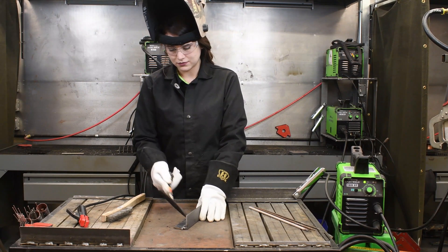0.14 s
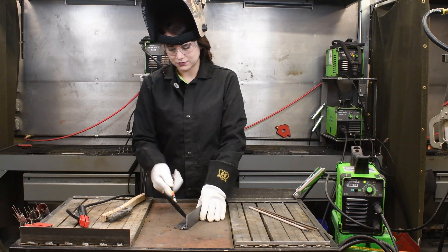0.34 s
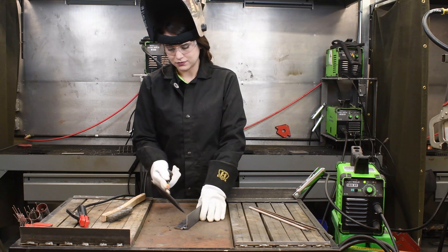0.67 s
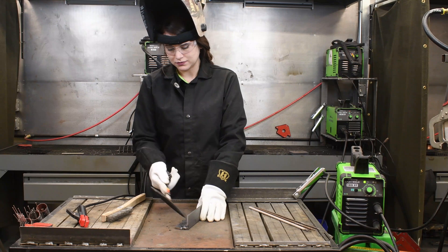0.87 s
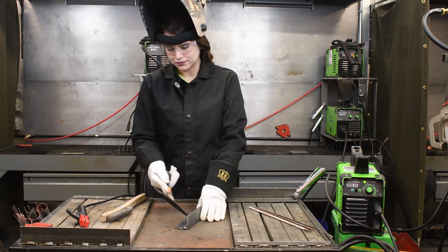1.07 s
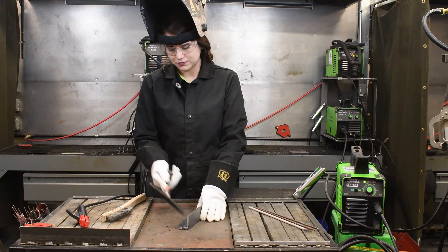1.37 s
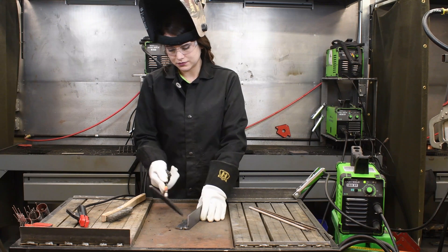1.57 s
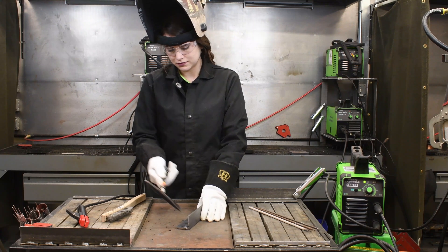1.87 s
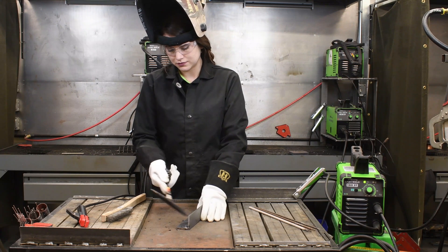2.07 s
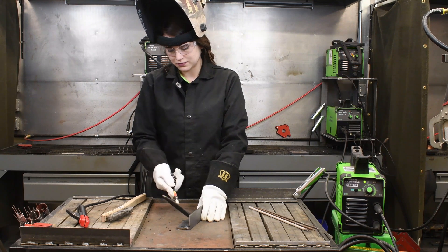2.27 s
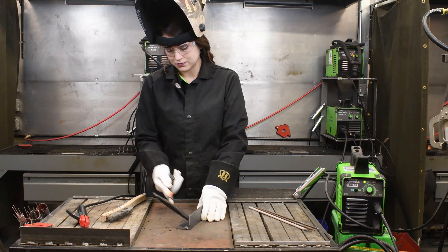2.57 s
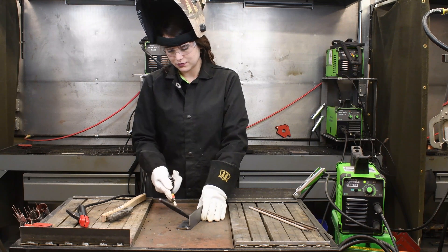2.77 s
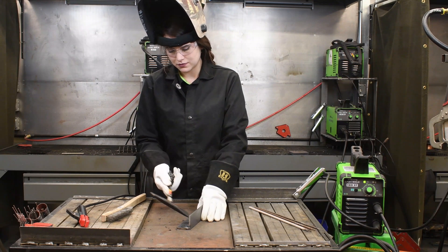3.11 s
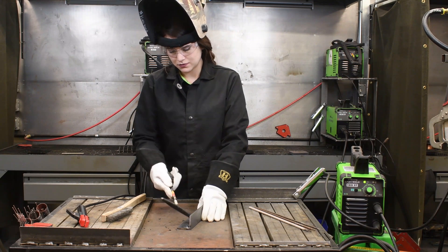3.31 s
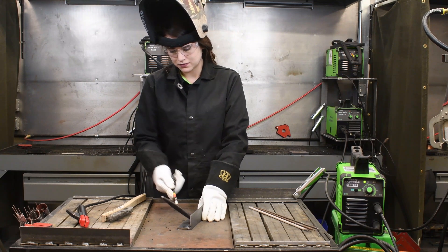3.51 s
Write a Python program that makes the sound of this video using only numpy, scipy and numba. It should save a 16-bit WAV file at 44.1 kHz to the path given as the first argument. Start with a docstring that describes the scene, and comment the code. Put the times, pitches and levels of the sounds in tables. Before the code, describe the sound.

A chipping hammer hits a steel plate on a metal bench about four times a second, bright clangs overlapping with crackling slag; then a short groan, a scrape and weaker blows over faint workshop air, close stereo.

```python
"""Welding booth, stereo pair: at the start a blow on a steel plate is already ringing over workshop air.
A chipping hammer goes on about four times a second, slower later; each blow sums a noise clang, decaying
modes of bench and steel, slag clicks, a dull thump and a sway of the bench frame.
At 2.5 s the plate groans (sine), from 2.74 s the tip drags over the bead (knocks through the bench response),
at 3.07 s a flake lands (noise tick). The recorder's limiter squeezes the peaks and its filter cuts the top."""
import sys
import numpy as np
from scipy import signal
from scipy.fft import rfft, irfft, next_fast_len
from scipy.io import wavfile
from scipy.ndimage import uniform_filter1d, minimum_filter1d
from numba import njit

SR = 44100
rng = np.random.default_rng(int(sys.argv[2]) if len(sys.argv) > 2 else 0)


def persist_wave(psi):
    """Save psi, clipped to +-1, as 16-bit WAV."""
    counts = np.round(np.clip(psi, -1, 1) * 32767).astype(np.int16)
    wavfile.write(sys.argv[1], SR, np.atleast_2d(counts).T)


N = 160965  # length in samples

# Hammer blows [t/s, strength level/dB, boom level/dB, middle against outer registers level/dB (half each way),
# steel ring level/dB, treble level/dB, accent f/Hz, accent level/dB, singing mode f/Hz, its level/dB]
BLOWS = [ (-.085, -1, -1.5, -1.5, 4, 0, 1740, 3.5, 1297, 14),
         (0.1544, 1.5, -2, 0.5, 5.5, 3, 2830, 5.5, 3100, -5),
         (0.4074, -0.5, 1.5, 1, -10, 3.5, 340, -0.5, 5700, 6),
         (0.6452, -4, 3, -0.5, -14, 0, 358, 2, 6370, 13), (0.8645, 0.5, -1, 0.5, 1, 0, 1400, 1, 3140, 6),
         (1.0874, -4, -4.5, -1.5, -1, -2, 855, 5, 2958, 7.5),
         (1.3084, -4.5, 6, 4.5, 2.5, 1.5, 696, 0, 1297, 2),
         (1.5328, 0, 4, 2.5, -4, -0.5, 5470, 0.5, 1379, -2), (1.7523, 2.5, -1, 5, 4.5, 3, 2660, 3, 3200, 8),
         (2.0510, 6.5, -6, 0, -7, -2, 5900, 3.5, 6115, 2), (2.3035, 6, -5, 0, 2, 1, 1430, 0.5, 2345, 2),
         (2.7093, -6, -8, 2.5, 1, -0.5, 1400, 3, 9470, 11.5),
         (3.3481, -2, 0, 0.5, -8, -4, 170, 0.5, 2310, 9), (3.5858, -8, 3, 2.5, -9, -6, 170, 3, 3150, 3)]
# Dense ringing of bench and booth [f/Hz, relative level/dB, t60/s, left-right correlation/0-1,
# left minus right level/dB]
CLANG_BANDS = [(116, -45, 0.99, 1, 2), (170, -26.5, 1, 0.99, -0.5), (295, -24.5, 0.92, 0.92, 0.5),
               (480, -24.5, 0.8, 0.94, 0), (840, -23.5, 0.74, 0.67, 0), (1400, -21.5, 0.75, 0.51, 0),
               (2020, -22, 0.64, 0.18, -1.8), (3200, -21.5, 0.64, 0.02, -0.2),
               (4400, -21.5, 0.52, 0.35, -0.5), (5920, -20.5, 0.4, 0.25, 0), (7350, -25.5, 0.45, 0.16, 1.5),
               (9400, -27.5, 0.41, 0.2, -5.5), (10340, -37, 0.33, 0.16, -6), (14700, -50, 0.37, 0, 3)]
# Modes of the bench top [f/Hz, relative level/dB]
BENCH_MODES = [(133, -26), (168, -24), (189, -28.5), (228, -26.5), (258, -22.5), (302, -17.5), (349, -14),
               (377, -27)]
# Modes of hammer and plate [f/Hz]
STEEL_HZ = [832, 1297, 1379, 2305, 2345, 2385, 2578, 2958, 3120, 3176, 3748, 5406, 5556, 6115, 6210, 6836,
            8250, 9215, 9470]
# Their strengths, in the same order [relative level/dB]
STEEL_LEVELS = [-28.5, -38, -27, -20, -16, -24.5, -25.5, -21.5, -44, -31, -30, -26.5, -26, -26.5, -29.5,
                -30, -25, -30, -32]
# Sway of the bench frame [f/Hz, relative level/dB, t60/s]
FRAME = (67.2, -39, 1.75)
# Dull push of each blow through the floor [f/Hz, relative level/dB, decay time constant/s]
THUMP = (44, -42, 0.057)
# Spectrum of the workshop air [f/Hz, relative level/dB per Hz]
AIR_SPECTRUM = [(25, -11), (60, -31), (110, 0), (200, -17), (400, 7.5), (1000, 2), (2000, -1.5),
                (4000, -9.5), (8000, -19.5), (11000, -31), (16000, -58)]
# The plate shifts on the bench with a short groan [t/s, f/Hz, level/dB]
SHIFT = (2.5, 180, -19)
# Pressure on the tip as it drags [t/s, relative level/dB]
DRAG_PRESSURE = [(2.741, -11.5), (2.785, -5), (2.804, 1), (2.85, -4), (2.89, -15.5), (2.95, -22)]
# The plate judders under the dragging tip [f/Hz, relative level/dB]
JUDDER_MODES = [(190, -23), (258, -12), (312, -13.5)]
# A flake of slag lands [t/s, f/Hz, level/dB at the onset]
FLAKE = (3.066, 8600, -49)

# the blow: register edges, widths of its colourings, onset
BOOM_HZ, TREBLE_HZ = 464, 3530
ACCENT_OCTAVES, SING_OCTAVES = 0.45, 0.035
SAME_SPOT = 0.24  # share of the clang's power that every blow has in common
SPOT_RIPPLE_DB = 2.2  # random unevenness of the clang above the boom
ATTACK_S, BOOM_RISE_S = 0.0036, 0.0023
CRACK_DB, CRACK_S = 12.5, 0.0087  # bright crack of the contact, over the clang; weaker low down
RING_N = SR  # samples in one response

# modes
GRIP_DETUNE, MODE_SCATTER_DB = 0.002, 1.8  # spread of frequency (ratio) and level
MODE_DAMP_HZ = 9000  # here a mode dies twice as fast
BENCH_DB, BENCH_T60_S, BENCH_BLUR, BENCH_BLUR_HZ = 2.5, 0.52, 1, 24
BENCH_LOW_HZ = 117  # the bench top radiates little below this
STEEL_DB, STEEL_T60_S, STEEL_BLUR, STEEL_BLUR_HZ = 1.5, 0.52, 1.6, 45

# slag, air, groan, drag, flake
SLAG_DB, SLAG_PER_S, SLAG_FALL_S, SLAG_HZ = -32.5, 1000, 0.06, 6650
AIR_DB, AIR_LIKENESS = -38, 0.46
SHIFT_S = 0.035
DRAG_DB, DRAG_LOW_HZ, DRAG_TOP_HZ = -13, 147, 11100
SLIPS_PER_S, SLIP_SCATTER_DB = 170, 4  # inverse of the median gap; spread of knock level
FLAKE_DECAY_S = 0.022

# recorder
DRIVE_DB, LIMIT_DB, LIMIT_RATIO, RELEASE_S, MAKEUP_DB = 0.5, -0.5, 2.73, 0.036, 0.5
TOP_HZ = 15650


def undb(db):
    """Decibels to gain."""
    return 10 ** (np.asarray(db) / 20)


def unit(x):
    """Scale to rms 1."""
    return x / np.sqrt(np.mean(x ** 2))


def on_log(hz, points, values):
    """Read a curve on a log-frequency axis."""
    return np.interp(np.log(np.maximum(hz, 1)), np.log(points), values)


def bell(hz, centre, octaves):
    """Bell curve on a log-frequency axis, 1 at its centre."""
    return np.exp(-(np.log2(hz / centre) / octaves) ** 2)


def band(x, hz, octaves):
    """Smooth band-pass around hz."""
    f = np.maximum(np.fft.rfftfreq(x.shape[-1], 1 / SR), 1)
    return irfft(rfft(x) * bell(f, hz, octaves), x.shape[-1])


def high_pass(x, hz):
    """Remove what lies below hz."""
    return signal.sosfilt(signal.butter(4, hz, "high", fs=SR, output="sos"), x)


def decay(t, t60):
    """Exponential fall by 60 dB in t60 seconds."""
    return np.exp(-np.log(1000) * t / t60)


def stereo(pair, likeness):
    """Two unrelated signals to the left and right microphone with the given correlation."""
    c = np.clip(likeness, 0, 1)
    middle = np.sqrt((1 + c) / 2) * pair[0]
    side = np.sqrt((1 - c) / 2) * pair[1]
    return middle + side * np.array([[1], [-1]])


def add(out, x, start):
    """Mix x in at a time in s, cut to the length of the scene."""
    i = int(round(start * SR))
    a, b = max(i, 0), min(i + x.shape[-1], N)
    out[:, a:b] += x[:, a - i:b - i]


def noise_bands(centres, size):
    """Pairs of noises of rms 1 in adjoining bands."""
    f = np.fft.rfftfreq(size, 1 / SR)
    which = np.searchsorted(np.sqrt(centres[1:] * centres[:-1]), f)
    spectrum = rfft(rng.standard_normal((2, size))) * (f > centres[0] ** 2 / centres[1])
    return np.array([unit(irfft(spectrum * (which == k), size)) for k in range(len(centres))],
                    dtype=np.float32)


def ring(modes, t60, blur, blur_hz, likeness):
    """Decaying modes, a little different with every grip and blurred by the booth's reflections."""
    t = np.arange(0, RING_N, dtype=np.float32) / SR
    knots = np.arange(0, 200) / blur_hz
    out = np.zeros((2, RING_N))
    for hz, db in modes:
        detune, size = rng.standard_normal(2)
        turn = np.float32(2 * np.pi * hz * (1 + GRIP_DETUNE * detune)) * t
        fade = decay(t, t60 / (1 + (hz / MODE_DAMP_HZ) ** 2))  # high modes die sooner
        for ch in range(2):
            # steady phasor plus a wandering one
            scatter = rng.standard_normal(len(knots)) + 1j * rng.standard_normal(len(knots))
            phasor = np.exp(2j * np.pi * rng.random()) + blur * scatter / np.sqrt(2)
            phasor = undb(db + MODE_SCATTER_DB * size) * phasor
            in_phase = np.interp(t, knots, phasor.real) * np.cos(turn)
            quadrature = np.interp(t, knots, phasor.imag) * np.sin(turn)
            out[ch] += fade * (in_phase + quadrature)
    return stereo(out, likeness) / np.hypot(1, blur)


def workbench():
    """Return the response of plate, bench and booth to one contact: noise bands plus decaying modes."""
    t = np.arange(RING_N) / SR
    hz = np.geomspace(100, 15000, 50)
    table = np.array(CLANG_BANDS)
    db, t60, likeness, pan_db = (on_log(hz, table[:, 0], col) for col in table.T[1:])
    low = 1 / (1 + (hz / BOOM_HZ) ** 4)
    high = 1 / (1 + (TREBLE_HZ / hz) ** 4)
    rise = 1 - np.exp(-t / (ATTACK_S + BOOM_RISE_S * low[:, None]))
    crack = 1 + undb(CRACK_DB) * (hz / (hz + TREBLE_HZ))[:, None] * np.exp(-t / CRACK_S)
    fade = (rise * crack * decay(t, t60[:, None])).astype(np.float32)[:, None]
    common = noise_bands(hz, size=RING_N)
    varied = noise_bands(hz, size=3 * RING_N)
    to_mics = np.array([stereo(np.eye(2), c) * undb(np.array([[p], [-p]]) / 2)
                        for c, p in zip(likeness, pan_db)])

    def respond(boom_db, middle_db, ring_db, treble_db, accent_hz, accent_db, sing_hz, sing_db):
        """Dense clang, bench modes and steel modes, weighted by where and how the tip lands."""
        def accent(f):
            """Lift of the favoured range in dB."""
            return accent_db * bell(f, accent_hz, ACCENT_OCTAVES)

        def steel_level(f, level):
            """Level of a steel mode in dB, with the singing mode lifted."""
            return level + sing_db * bell(f, sing_hz, SING_OCTAVES) + (treble_db if f > TREBLE_HZ else ring_db)

        i = rng.integers(varied.shape[-1] - RING_N)
        own = varied[..., i:i + RING_N]
        bands = fade * (SAME_SPOT ** .5 * common + (1 - SAME_SPOT) ** .5 * own)
        ripple = SPOT_RIPPLE_DB * (1 - low) * np.diff(rng.standard_normal(len(hz) + 1)) / np.sqrt(2)
        registers = low * boom_db + (0.5 - low - high) * middle_db + high * treble_db
        gain = undb(db + registers + accent(hz) + ripple)
        weights = (gain[:, None, None] * to_mics).astype(np.float32)
        clang = np.tensordot(weights, bands, ([0, 2], [0, 1]))

        bench = [(f, level + accent(f)) for f, level in BENCH_MODES]
        boom = ring(bench, BENCH_T60_S, BENCH_BLUR, BENCH_BLUR_HZ, likeness=1.0)
        boom = high_pass(boom * (1 - np.exp(-t / BOOM_RISE_S)), BENCH_LOW_HZ)

        modes = [(f, steel_level(f, level)) for f, level in zip(STEEL_HZ, STEEL_LEVELS)]
        steel = ring(modes, STEEL_T60_S, STEEL_BLUR, STEEL_BLUR_HZ, likeness=0.26)
        steel = steel * (rise * crack)[-1]  # onset of the highest band
        return clang + undb(BENCH_DB + boom_db) * boom + undb(STEEL_DB) * steel
    return respond


def slag():
    """Brittle crumbs crackle away after a blow: sparse random clicks, band-passed and fading."""
    t = np.arange(RING_N) / SR
    hits = rng.random((2, RING_N)) < SLAG_PER_S / SR
    clicks = hits * rng.standard_normal((2, RING_N))
    crackle = stereo(unit(band(clicks, SLAG_HZ, octaves=0.67)), likeness=0.27)
    return undb(SLAG_DB) * crackle * np.exp(-t / SLAG_FALL_S)


def hammer(respond):
    """The blows, each with its spray of slag, a dull thump and a slow sway of the bench frame."""
    out = np.zeros((2, N))
    t = np.arange(N) / SR
    frame_hz, frame_db, frame_t60 = FRAME
    thump_hz, thump_db, thump_s = THUMP
    rumble = unit(band(rng.standard_normal(N), thump_hz, octaves=1))
    onset = 1 - np.exp(-t / BOOM_RISE_S)
    for start, db, boom_db, *colour in BLOWS:
        add(out, undb(db) * (respond(boom_db, *colour) + slag()), start)
        # the phase of the sway follows the clock of the scene
        sway = np.sin(2 * np.pi * frame_hz * (t + start)) * decay(t, frame_t60)
        sway = undb(frame_db + boom_db) * sway
        thump = undb(thump_db) * np.roll(rumble, rng.integers(N)) * np.exp(-t / thump_s)
        add(out, undb(db) * ((sway + thump) * onset)[None], start)
    return out


def air():
    """Steady ventilation of the workshop: noise shaped by its spectrum, spread over both microphones."""
    size = next_fast_len(N)
    colour = undb(on_log(np.fft.rfftfreq(size, 1 / SR), *np.array(AIR_SPECTRUM).T))
    noise = irfft(rfft(rng.standard_normal((2, size))) * colour, size)[:, :N]
    return undb(AIR_DB) * stereo(unit(noise), AIR_LIKENESS)


def plate_shift():
    """The plate groans briefly: a sine that swells and dies, alike in both microphones."""
    t = np.arange(N) / SR
    when, hz, db = SHIFT
    groan = undb(db) * np.sin(2 * np.pi * hz * t) / np.cosh((t - when) / SHIFT_S)
    return np.array([groan, groan])


def drag(respond):
    """The tip sticks and slips in uneven knocks over the ripples of the bead, and the plate judders."""
    when, db = np.array(DRAG_PRESSURE).T
    gaps, sizes = rng.standard_normal((400, 2)).T
    times = when[0] + np.cumsum(np.exp(gaps / 2)) / SLIPS_PER_S
    level_db = np.interp(times, when, db) + SLIP_SCATTER_DB * np.clip(sizes, -1, 1)
    knocks = undb(level_db) * rng.choice([-1, 1], len(times))
    inside = times < when[-1]
    push = np.zeros(N)
    np.add.at(push, (times[inside] * SR).astype(int), knocks[inside])
    push = signal.sosfilt(signal.butter(2, DRAG_TOP_HZ, fs=SR, output="sos"), push)
    body = respond(boom_db=-1, middle_db=3, ring_db=-4, treble_db=-8.5,
                   accent_hz=1330, accent_db=-2, sing_hz=9470, sing_db=17)
    body = body + ring(JUDDER_MODES, t60=0.68, blur=0.99, blur_hz=24.6, likeness=1.0)
    scrape = signal.fftconvolve(push[None], body, axes=1)[:, :N]
    return undb(DRAG_DB) * high_pass(scrape, DRAG_LOW_HZ)


def flake():
    """A flake of slag lands: a fading tick of band-passed noise."""
    t = np.arange(RING_N) / SR
    when, hz, db = FLAKE
    noise = unit(band(rng.standard_normal((2, RING_N)), hz, octaves=0.32))
    out = np.zeros((2, N))
    add(out, undb(db) * noise * np.exp(-t / FLAKE_DECAY_S), when)
    return out


def scene():
    """Hammering at the bench in the workshop."""
    respond = workbench()
    return hammer(respond) + air() + plate_shift() + drag(respond) + flake()


@njit
def follow(x, release):
    """Peak follower: jumps up, sinks slowly."""
    out, e = np.empty(len(x)), 0.
    for i in range(len(x)):
        e = max(x[i], e * release)
        out[i] = e
    return out


def record(dry):
    """The limiter turns both channels down together by a ratio, full scale clips, and the top is cut."""
    x = dry * undb(DRIVE_DB)
    peak = follow(np.abs(x).max(axis=0), np.exp(-1 / (RELEASE_S * SR)))
    gain = np.minimum(1, undb(LIMIT_DB) / (peak + 1e-9)) ** (1 - 1 / LIMIT_RATIO)
    gain = uniform_filter1d(minimum_filter1d(gain, size=60), size=60)  # turn down just ahead of a peak
    loud = np.clip(x * gain * undb(MAKEUP_DB), -1, 1)
    return signal.sosfilt(signal.ellip(8, .2, 70, TOP_HZ, fs=SR, output="sos"), loud)


dry = scene()
out = record(dry)
persist_wave(out)
```